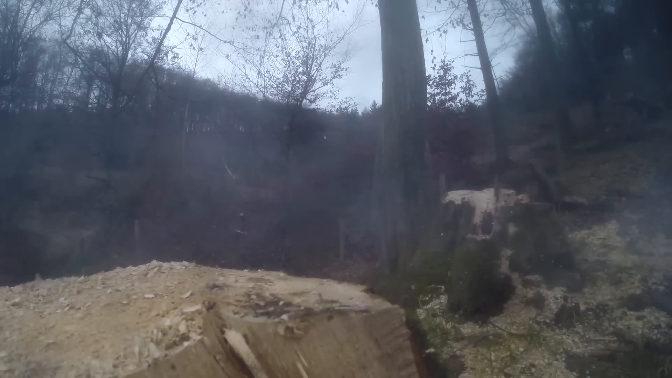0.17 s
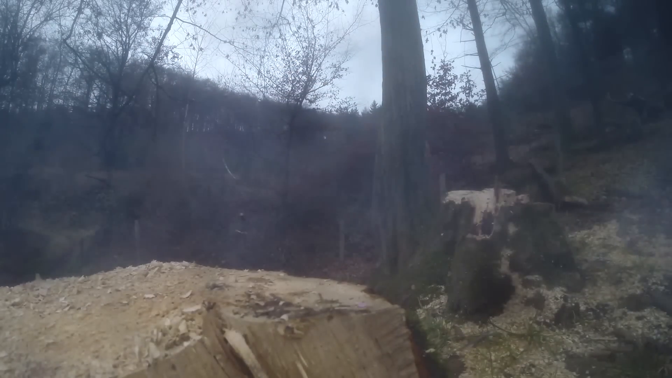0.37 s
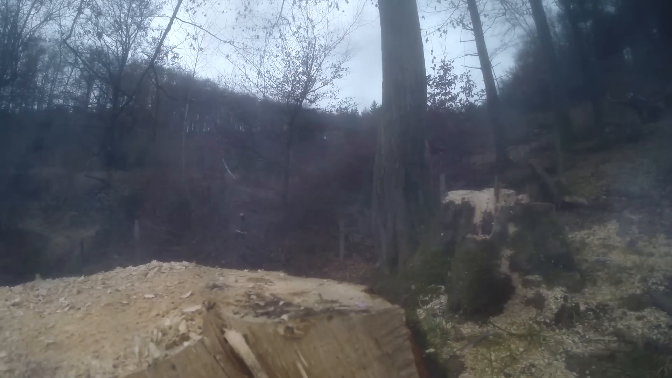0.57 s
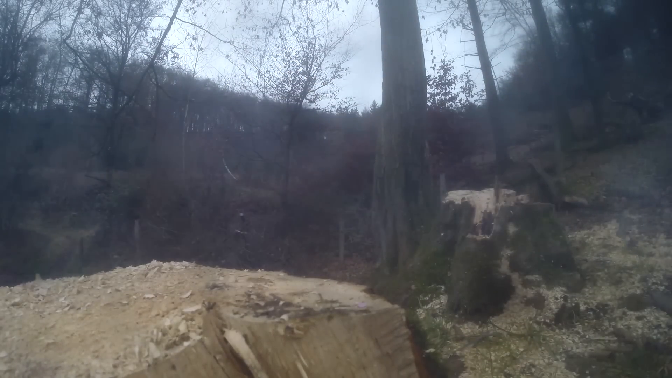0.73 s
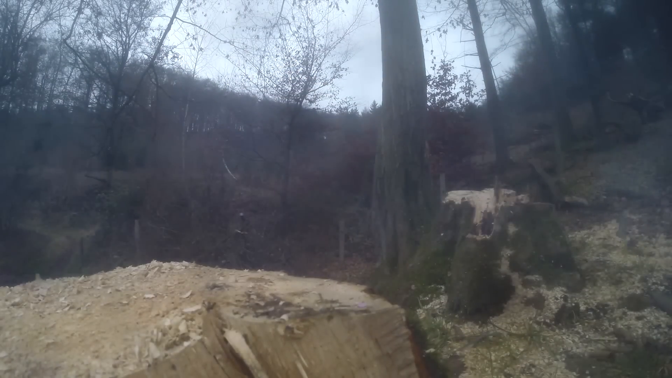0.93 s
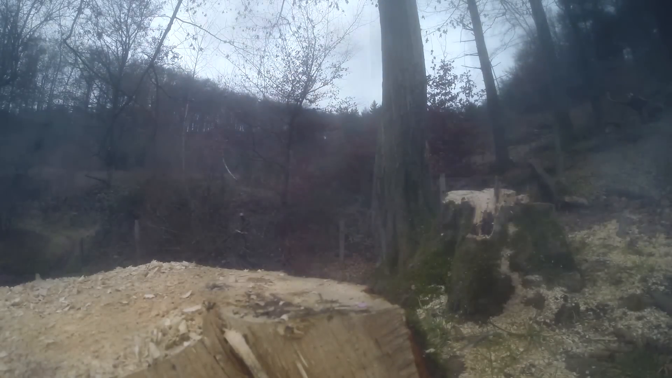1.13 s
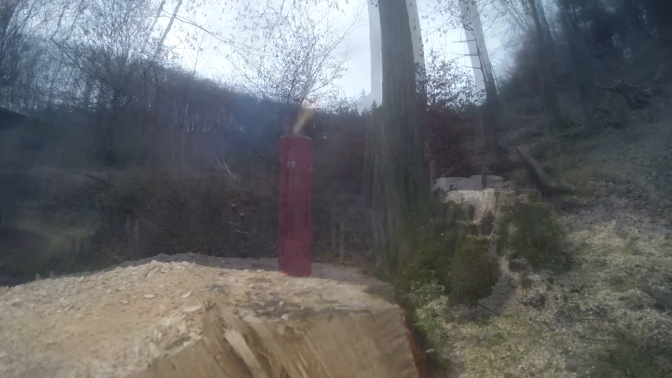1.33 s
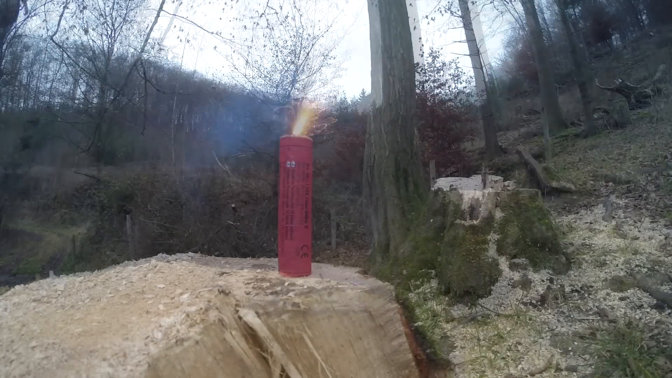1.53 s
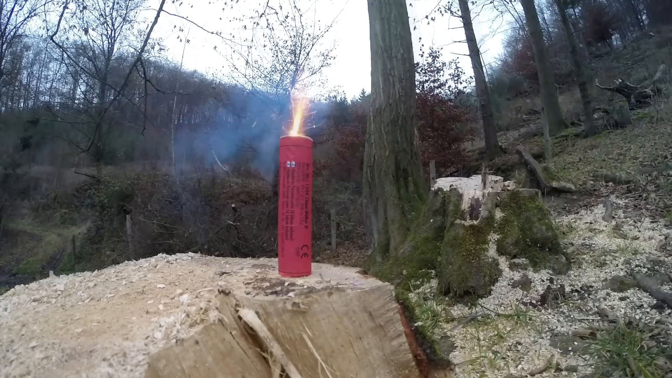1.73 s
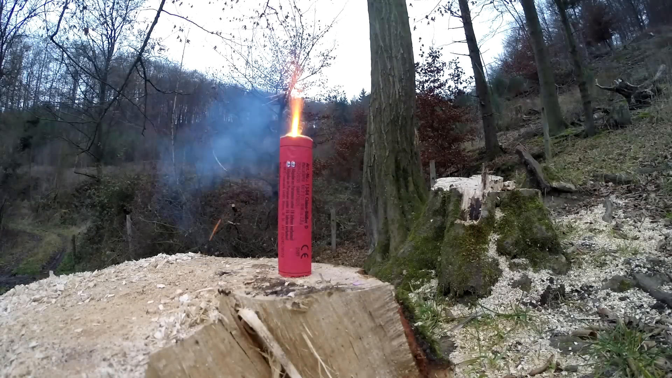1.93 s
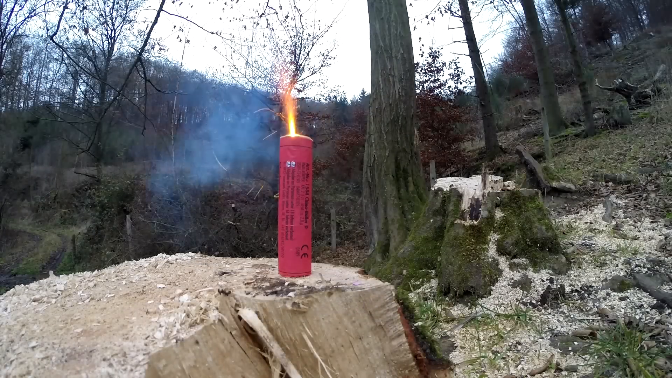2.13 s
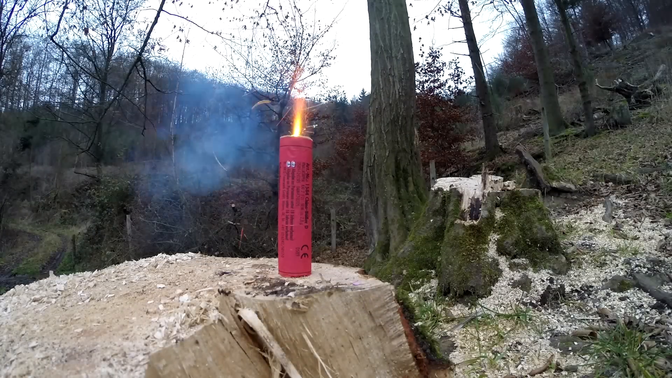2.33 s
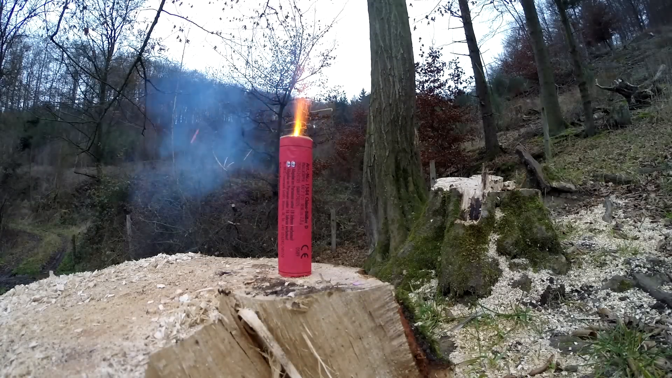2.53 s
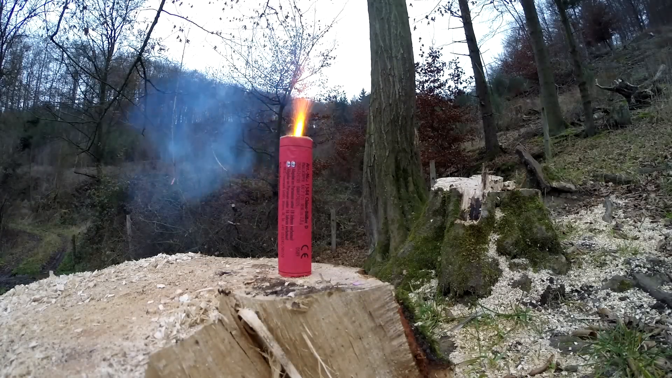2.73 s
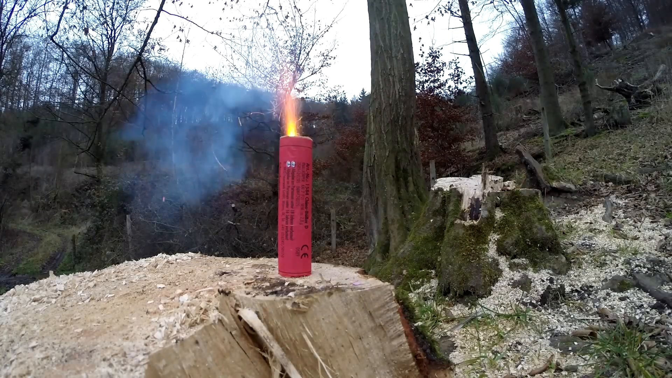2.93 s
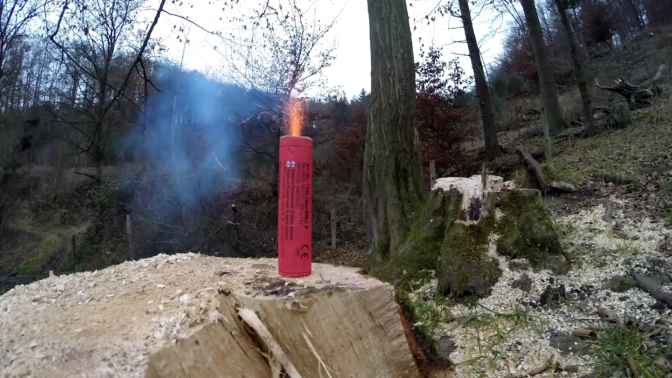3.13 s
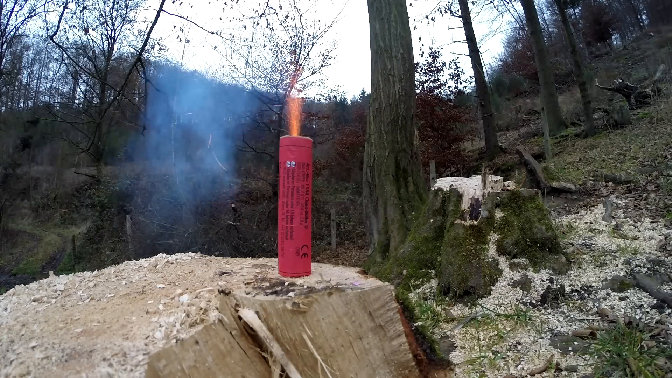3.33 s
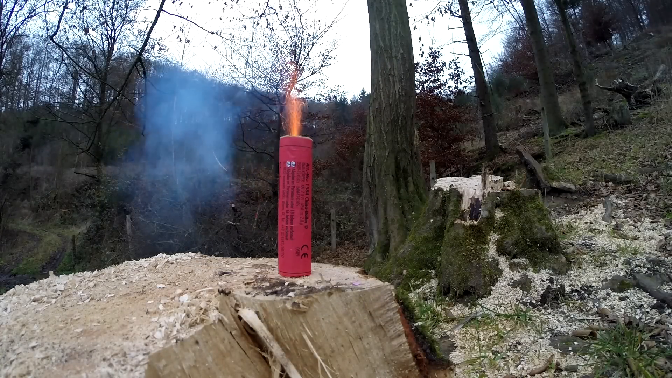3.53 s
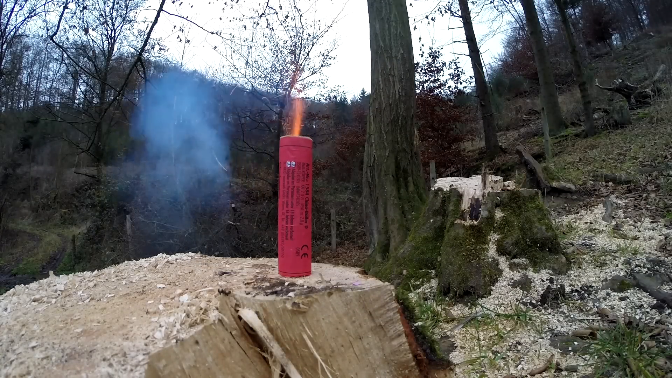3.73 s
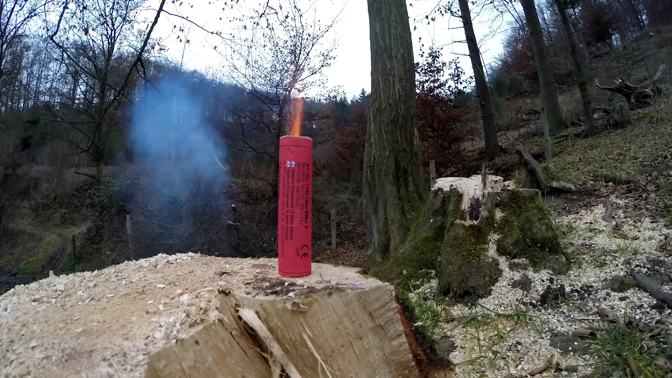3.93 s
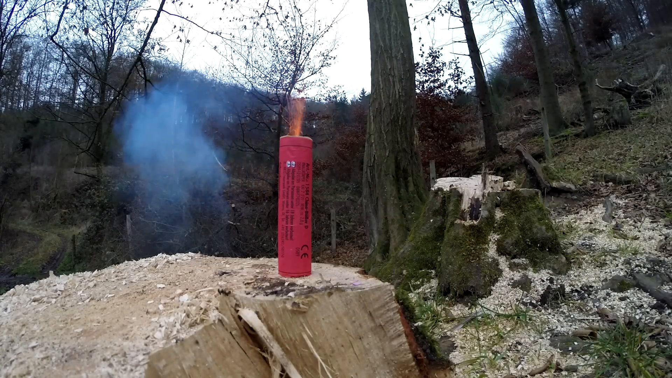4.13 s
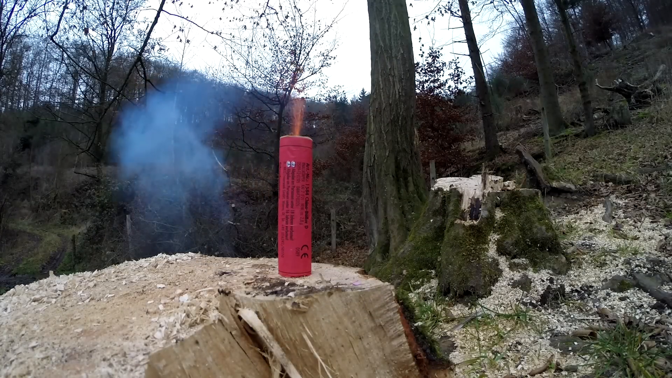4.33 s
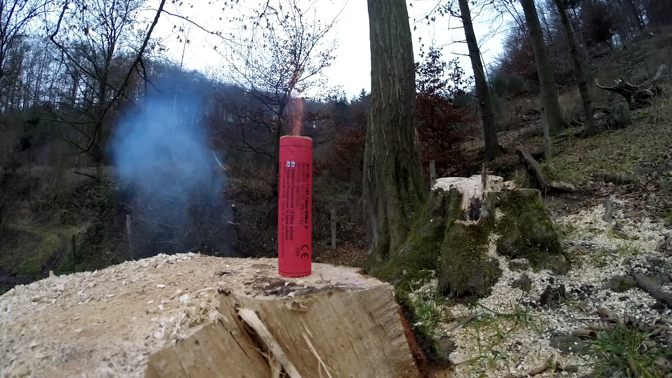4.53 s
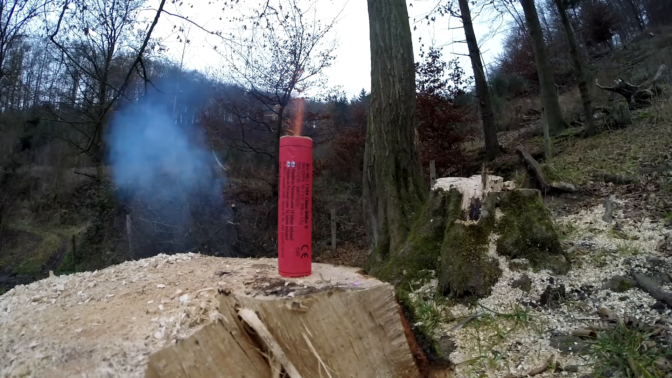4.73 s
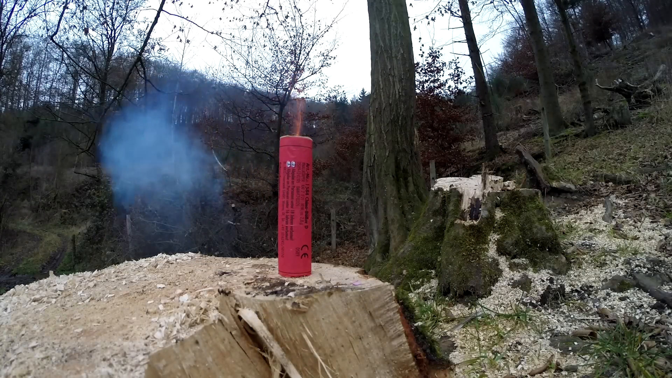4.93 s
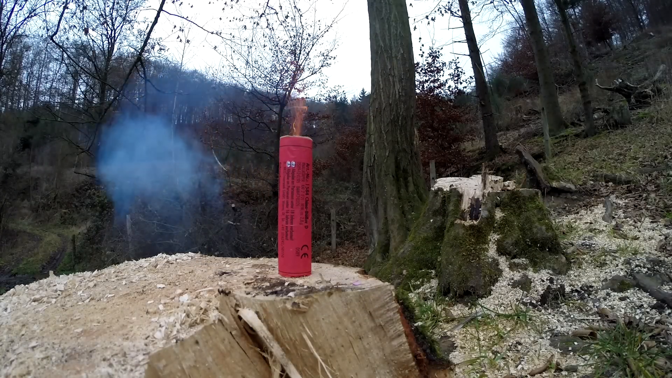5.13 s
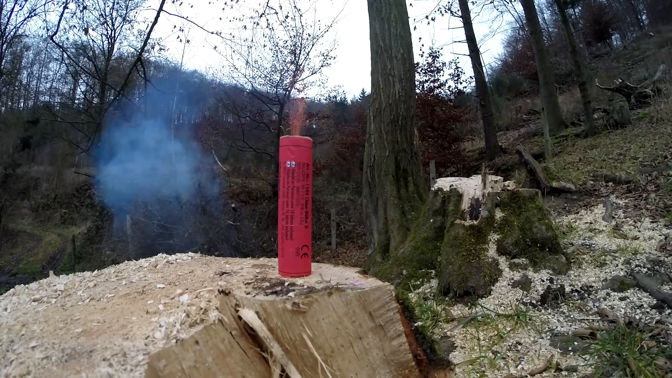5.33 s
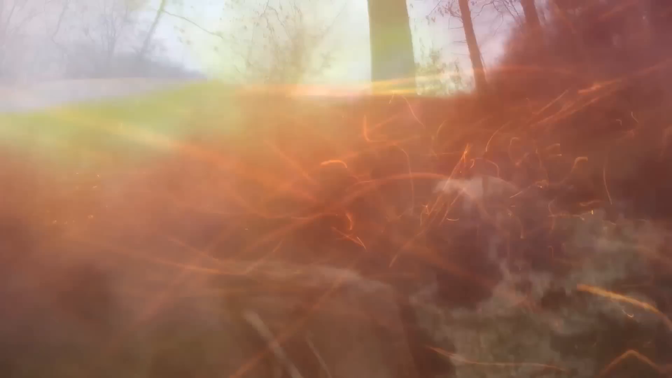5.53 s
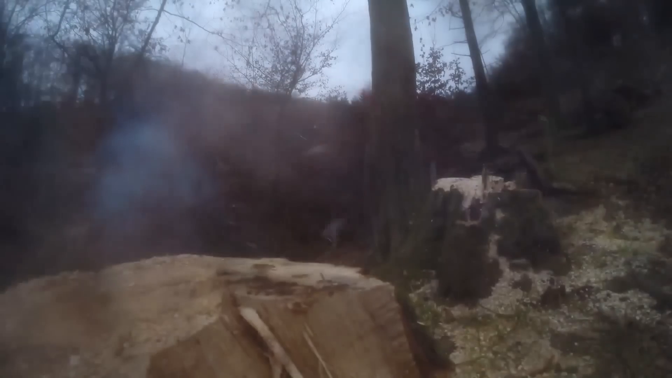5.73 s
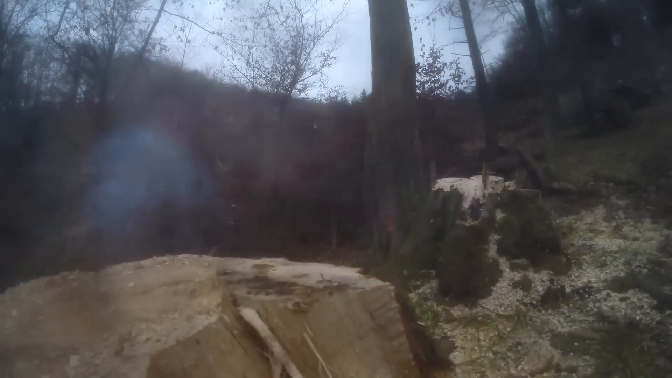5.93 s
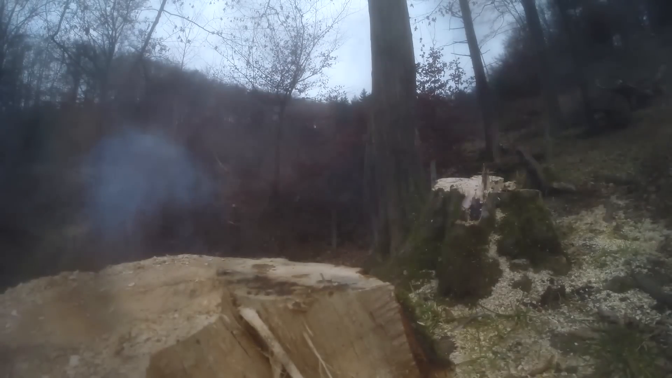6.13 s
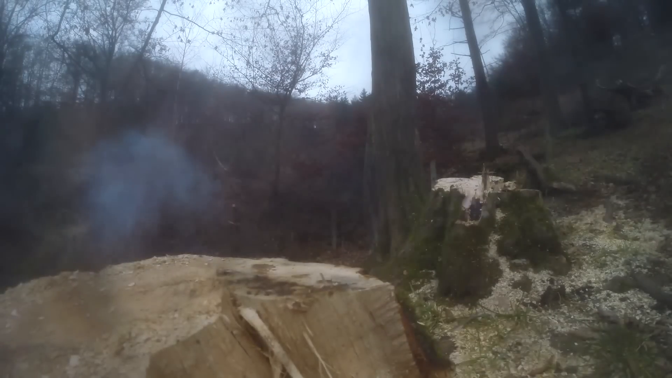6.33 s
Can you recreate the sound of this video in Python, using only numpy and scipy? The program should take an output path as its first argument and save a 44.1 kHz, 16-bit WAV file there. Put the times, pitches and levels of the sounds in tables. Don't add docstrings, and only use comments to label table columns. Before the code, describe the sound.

Outdoors in a wood, a firecracker fuse hisses and sputters, duller as it sinks, then a single violent, clipped blast echoes off the trees.

```python
import sys
import numpy as np
from scipy import signal
from scipy.fft import rfft, irfft
from scipy.io import wavfile
from scipy.ndimage import uniform_filter1d

SR = 44100
rng = np.random.default_rng(int(sys.argv[2]) if len(sys.argv) > 2 else 0)


def wav_out(sig):
    wavfile.write(sys.argv[1], SR, np.round(np.clip(np.atleast_2d(sig).T, -1, 1) * 32767).astype(np.int16))


def nominal_scale(level):
    x = np.asarray(level, float) / 20
    return 10 ** x


N = 284886
EARLIER_S, EARLIER_DB = -0.79, 6.5
BLAST_S, BLAST_DB, BLAST_T60_S = 5.5917, 24, 0.013


def rms_one(x):
    return x / np.sqrt(np.mean(x ** 2) + 1e-20)


def levels(rows):
    s, *columns = np.transpose(rows)
    t = np.arange(N) / SR
    return [nominal_scale(np.interp(t, s, column, left=-200, right=-200)) for column in columns]


def bump(t, length):
    return np.exp(-0.5 * (t / length) ** 2)


def drift(rate):
    r = np.exp(-2 * np.pi * rate / SR)
    slow = signal.lfilter([1], [1, -2 * r, r * r], rng.standard_normal(N + SR))
    slower = uniform_filter1d(slow, size=int(3 * SR / rate))
    return rms_one((slow - slower)[SR:])


def coloured(x, spectrum, edges, notches=()):
    hz = np.arange(1, N // 2 + 2) * SR / N
    spectrum_hz, spectrum_db = np.transpose(spectrum)
    db = np.interp(np.log(hz), np.log(spectrum_hz), spectrum_db)
    for centre, width, depth_db in notches:
        db += depth_db / (1 + (2 * (hz - centre) / width) ** 2)
    shaped = rfft(x) * nominal_scale(db)
    below = [0 * hz] + [1 / (1 + (hz / edge) ** 16) for edge in edges] + [1 + 0 * hz]
    return [rms_one(irfft(shaped * np.sqrt(high - low), N)) for low, high in zip(below, below[1:])]


def ring(hz, t60, length=0.6):
    t = np.arange(int(length * SR)) / SR
    return np.sin(2 * np.pi * hz * t) * nominal_scale(-60 * t / t60)


def add(out, s, sound):
    i = round(s * SR)
    out[i:i + len(sound)] += sound[:N - i]


# pitch_hz, level_db (per Hz)
WOODS = [(240, -61), (400, -28.5), (599, -22), (753, -12.5), (947, -12.5), (1560, -9), (1740, -7.5),
         (2640, -9.5), (3100, -21.5), (3450, -21.5), (10000, -41), (13000, -85.5), (22000, -120)]
# pitch_hz, width_hz, level_db
PORT = [
    (1607, 78, 11.5),
    (2030, 200, 1),
    (2580, 350, 0.5),
]
# after_blast_s, level_db
ECHO = [
    (.02, -49.5),
    (0.081, -52),
    (.095, -45),
    (.17, -44.5),
    (.24, -52.5),
    (.38, -58.5),
    (1.06, -59.5),
    (1.56, -69),
    (2.1, -72),
]
# level_db, loss_db_per_s, nearest_trunks_db, nearest_trunks_t60_s
ECHO_PARTS = [
    (-10.5, -2, -47, .17),
    (-2, 2.5, -61.5, 0.13),
    (-5, -6, -48, 0.31),
]


def woods():
    far_s, far_db, far_length_s = 0.675, 10.5, 0.055
    lumpy = rng.standard_normal(N) * nominal_scale(1.1 * drift(45))
    parts = coloured(lumpy, WOODS, [1300, 3200], PORT)
    out = np.zeros(N)
    for s, blast_db in [(EARLIER_S, EARLIER_DB), (BLAST_S, 0)]:
        after = np.arange(N) / SR - s
        echo, = levels([(s + lag, db + blast_db) for lag, db in ECHO])
        late = [nominal_scale(far_db * bump(after - far_s, far_length_s)), 1, 1]
        for (db, loss_db, near_db, t60), far, part in zip(ECHO_PARTS, late, parts):
            near = (after > ECHO[0][0]) * nominal_scale(near_db - 60 * np.abs(after) / t60)
            spread = echo * far * nominal_scale(db + loss_db * after)
            out += np.hypot(spread, near) * part
    return out


# after_blast_s, level_db
DUCK = [
    (.215, -0.5),
    (.245, -11),
    (.6, -8),
    (.87, -5),
    (1.06, -3),
    (1.38, 0.5),
]


def gain_control():
    t = np.arange(N) / SR
    duck_db = sum(np.interp(t - s, *np.transpose(DUCK)) for s in (EARLIER_S, BLAST_S))
    struck = (t > BLAST_S) * (t < BLAST_S + DUCK[1][0])
    return duck_db, struck


# pitch_hz, level_db (per Hz)
AIR_COLOUR = [(12, -26.5), (20, 0), (129, -1), (180, -3.5), (314, -6.5), (1070, -12), (1620, -15),
              (1860, -18.5), (8370, -26.5), (10500, -26.5), (11400, -30), (12400, -27), (15400, -34.5)]


def air():
    duck_db, struck = gain_control()
    rumble, hiss = coloured(rng.standard_normal(N), AIR_COLOUR, [4000])
    flame_roar = nominal_scale(-14.5 + 2.5) * jet_gains()[0]
    rumble_gain = np.hypot(nominal_scale(-56.5 + duck_db), flame_roar)
    hiss_db = -66.5 + np.minimum(1.9 * duck_db, -5.5 * struck)
    return rumble_gain * rumble + nominal_scale(hiss_db) * hiss


def whine():
    whine_hz, frame_hz = 11000, 50
    t = np.arange(N) / SR
    duck_db, struck = gain_control()
    pulsing = 1
    for k, side in enumerate([0.4, 0.18, 0.12, 0.06], start=1):
        pulsing = pulsing + side * np.exp(-2j * np.pi * k * frame_hz * t)
    tone = np.sqrt(2) * np.real(pulsing * np.exp(2j * np.pi * whine_hz * t))
    return nominal_scale(-73 + np.minimum(duck_db, -9 * struck)) * tone


# start_s, peak_db, pitch_hz, t60_s
TICKS = [(0.0144, -29.5, 7300, 0.0082), (0.0961, -56, 5910, 0.012), (0.1869, -41.5, 5600, 0.01),
         (0.2534, -61, 5340, 0.012), (0.2692, -57, 4510, 0.012), (0.4218, -50, 5570, 0.012),
         (0.4354, -48, 5030, 0.012), (0.4612, -49, 5380, 0.012), (0.5081, -49, 5700, 0.012),
         (0.5254, -49, 6020, 0.012), (0.619, -47, 9640, 0.011), (0.6684, -49, 6740, 0.012),
         (0.8613, -49, 6020, 0.012), (0.933, -39, 9450, 0.011), (0.946, -49, 6090, 0.012),
         (0.9574, -55, 5200, 0.012), (1.2342, -35, 6500, 0.014), (1.239, -29.5, 5650, 0.016),
         (1.247, -38, 5360, 0.013), (5.797, -52, 11500, .01), (5.819, -49, 9000, 0.011),
         (5.911, -41.5, 4500, 0.01), (5.911, -49, 10000, 0.01), (5.9934, -56, 8960, 0.011),
         (6.349, -54.5, 7000, .012), (6.359, -60, 7030, .012)]


def ticks():
    out, t = np.zeros(N), np.arange(2000) / SR
    for s, db, hz, t60 in TICKS:
        noise = rng.standard_normal(len(t))
        band = signal.butter(2, [hz / 1.5, min(hz * 1.5, 0.45 * SR)], "band", fs=SR, output="sos")
        burst = signal.sosfilt(band, noise * nominal_scale(-60 * t / t60))
        add(out, s + 0.001094, nominal_scale(db) * burst / np.abs(burst).max())
    return out


# start_s, peak_db, pitch_hz, t60_s
KNOCKS = [(.097, -50, 1900, .04), (.27, -39, 3100, 0.027), (.365, -39, 1590, .03),
          (0.389, -40, 246.4, 0.21), (1.2418, -27.5, 1840, 0.02), (1.2418, -24, 2280, 0.015),
          (1.2413, -25, 3050, 0.019), (1.24, -14.5, 5700, .007), (1.2352, -39.5, 5530, .01),
          (5.616, -19, 2300, 0.013), (5.617, -34, 3300, .015), (5.767, -39, 3100, 0.053),
          (5.791, -35, 586, 0.043), (5.814, -42, 564, 0.068), (5.9455, -42, 1100, .015),
          (5.946, -35, 1740, 0.023), (6.426, -40, 259, .14)]


def knocks():
    out = np.zeros(N)
    rise = 1 - np.exp(-np.arange(int(0.6 * SR)) / SR / 0.0004)
    for s, db, hz, t60 in KNOCKS:
        pair = ring(hz, t60) + 0.74 * ring(1.13 * hz, 0.55 * t60)
        add(out, s, nominal_scale(db - 5) * rise * pair)
    return out


# pitch_hz, level_db, t60_s
CRACK = [(1040, -22, 0.035), (1350, -13, 0.024), (1640, -29, 0.089), (1873, -14, 0.037), (2270, -16, 0.014),
         (2860, 1, 0.025), (3180, -19, 0.025), (4600, -19, 0.0091), (4970, -16, 0.016),
         (6200, -17.5, 0.025), (6640, -37, 0.016)]


def chip_crack():
    start_s, level_db, low_hz = 0.3865, -19.5, 875
    out, t = np.zeros(N), np.arange(400) / SR
    thin = signal.butter(4, low_hz, "high", fs=SR, output="sos")
    for hz, db, t60 in CRACK:
        chatter = rng.standard_normal(len(t)) * nominal_scale(-60 * t / 0.026)
        chatter[int(0.0008 * SR)] = 9.0
        chatter[int(0.0036 * SR)] = 3.0
        tone = signal.sosfilt(thin, np.convolve(chatter, ring(hz, 0.9 * t60, 0.1)))
        add(out, start_s, nominal_scale(level_db + db - 17) * tone)
    return out


# time_s, level_db
VIGOUR = [
    (1.14, -78),
    (1.27, -57.5),
    (1.5, -51),
    (2.05, -44.5),
    (2.7, -37.5),
    (3.3, -39),
    (3.85, -39),
    (4.5, -43.5),
    (4.88, -42),
    (5.58, -47.5),
]
# time_s, level_db, length_s
SPURTS = [(1.41, 1, 0.038), (1.695, 0.5, 0.0085), (1.78, -3.5, 0.026), (1.806, 2.5, 0.012),
          (2.015, 2, 0.025), (2.347, -1.5, 0.036), (2.623, -0.5, 0.015), (2.652, -3.5, 0.011),
          (2.686, 0.5, .015), (3.105, 1.5, 0.027), (3.226, -1.5, 0.028), (3.26, 4, 0.012),
          (5.561, 10, 0.013)]
# sinking_s, open_air_db, sunk_db, later_sag_db_per_s, share_of_spurts
JET_PARTS = [
    (2.28, 2.5, -6.5, -1.45, 1.2),
    (2.3, -1.4, -1.5, 0.1, 0.9),
    (2.85, -14, -5.5, -2.3, 1),
    (1.8, -7, -25, 0.6, 1.1),
    (2.3, -10.5, -28, 0.7, 0.9),
]
FLARE_DB = [
    0,
    -11,
    7.5,
    2,
    -3,
]


def jet_gains():
    t = np.arange(N) / SR
    vigour, = levels(VIGOUR)
    spurt_db = sum(db * bump(t - s, length) for s, db, length in SPURTS)
    flare = bump(t - 2.94, 0.04)
    gains = []
    for (s, open_db, sunk_db, sag_db, share), flare_db in zip(JET_PARTS, FLARE_DB):
        sunk = 0.5 + 0.5 * np.tanh((t - s) / 0.24 / 2)
        depth_db = open_db + (sunk_db - open_db) * sunk
        later_db = sag_db * np.maximum(t - s, 0)
        gains.append(vigour * nominal_scale(depth_db + later_db + share * spurt_db + flare_db * flare))
    return gains


# pitch_hz, level_db (per Hz)
JET = [(760, -61), (1300, -37.5), (1520, -17), (1770, -10), (2030, -19), (2300, -13.5), (2800, -15),
       (3440, -3.5), (3780, 0), (4370, 0), (5830, -4.5), (7480, -25.5), (9590, -32), (11300, -24.5),
       (15400, -40.5)]
# pitch_hz, width_hz, level_db
NOTCHES = [(1400, 330, -21), (1659, 80, 10.5), (1830, 100, 6), (1949, 47, -15), (2090, 69, -9.5),
           (2900, 71, -13), (3770, 250, -10.5), (3486, 150, 4.5), (4380, 150, 5), (5460, 200, -7.5),
           (6250, 91, -22.5), (6750, 400, 5), (7600, 810, -3), (8250, 400, 9), (8680, 250, -11.5),
           (9640, 300, -8.5), (11800, 500, -7), (12800, 700, 0), (14700, 370, -3.5)]


def fuse():
    grains = (rng.random(N) < 400 / SR) * rng.exponential(1, N)
    spit = grains * rng.choice([-1, 1], N)
    jet = rng.standard_normal(N) + 0.31 * rms_one(spit)
    flutter_db = 0.76 * drift(16) + 0.43 * drift(45)
    parts = coloured(jet * nominal_scale(flutter_db), JET, [2880, 5300, 7490, 9600], NOTCHES)
    return sum(gain * part * nominal_scale(0.48 * drift(10)) for gain, part in zip(jet_gains(), parts))


def hiss_swell():
    swell_hz, level_db, rise_s = 5000, -10, 0.0022
    out, t = np.zeros(N), np.arange(600) / SR
    band = signal.butter(1, [0.85 * swell_hz, 0.93 * swell_hz], "band", fs=SR)
    hiss = rms_one(signal.lfilter(*band, rng.standard_normal(len(t))))
    add(out, BLAST_S - len(t) / SR, nominal_scale(level_db) * hiss * np.exp(-t[::-1] / rise_s))
    return out


# pitch_hz, level_db, t60_s
HOUSING = [(420, -6, .014), (663, -13, .012), (942, -11.5, .021), (982, 0.5, 0.022), (1286, -7.5, 0.044),
           (1630, -6, 0.043), (1830, -11, 0.046), (2087, -9.5, 0.032), (2565, -3, 0.024), (3100, 1, 0.024),
           (3668, -2.5, 0.016), (4790, -7, 0.015), (5700, -3, 0.015), (6230, -3, .005), (7520, -25, .02),
           (9100, -28, 0.013), (11210, -36.5, 0.026)]
# level_db, time_constant_s
REBOUND = [
    (-19, .007),
    (-40.5, .05),
]


def blast():
    suction_s, suction_length_s, suction_db = 0.0027, 0.00067, 1.5
    out, t = np.zeros(N), np.arange(3000) / SR
    roar = rng.standard_normal(len(t)) * nominal_scale(-60 * t / BLAST_T60_S)
    shock = 0.19 * np.diff(roar)
    shock[0] = 1
    body = sum(nominal_scale(db) * signal.fftconvolve(shock, ring(hz, 0.55 * t60, 0.05)) for hz, db, t60 in HOUSING)
    add(out, BLAST_S, -nominal_scale(BLAST_DB) * body / np.abs(body).max())
    band = signal.butter(2, [3500, 7300], "band", fs=SR, output="sos")
    crack = signal.sosfilt(band, np.diff(roar)) * np.exp(-t[1:] / 0.002)
    add(out, BLAST_S, nominal_scale(9.5) * crack)
    slap = signal.lfilter([0.5], [1, -0.5], roar)
    add(out, BLAST_S + 0.0085, nominal_scale(-17) * slap)
    add(out, BLAST_S, -nominal_scale(suction_db) * bump(t - suction_s, suction_length_s))
    settle = np.arange(SR // 4) / SR
    rebound = sum(nominal_scale(db) * np.exp(-settle / tau) for db, tau in REBOUND)
    add(out, BLAST_S + 1.5 * suction_s, rebound)
    return out


# delay_s, pitch_hz, level_db, t60_s
AFTER_RINGS = [
    (.004, 1815, -28, 0.43),
    (.004, 1790, -12, .04),
    (.111, 12.4, -41, .3),
    (.205, 15.6, -49, 1.7),
    (.229, 31.2, -58, 1.3),
    (.237, 46.8, -67, 1.5),
]
# time_s, level_db
SHAKE = [
    (5.625, -45),
    (5.651, -57),
    (5.711, -46),
    (5.749, -49),
    (5.815, -64),
    (5.86, -82),
]


def shaken_mount():
    out = np.zeros(N)
    for delay, hz, db, t60 in AFTER_RINGS:
        add(out, BLAST_S + delay, nominal_scale(db) * ring(hz, t60, 0.9))
    colour = [(20, -3.5), (60, 0), (120, -11.5), (300, -17.5), (900, -51.0)]   # Hz, dB per Hz
    rumble, = coloured(rng.standard_normal(N), colour, [])
    return out + levels(SHAKE)[0] * rumble


def scene():
    background = woods() + air() + whine()
    debris = ticks() + knocks() + chip_crack()
    firecracker = fuse() + hiss_swell() + blast() + shaken_mount()
    return (background + debris + firecracker)[None]


def top_cut(x):
    return signal.sosfilt(signal.butter(12, 15590, fs=SR, output="sos"), x)


def record(dry):
    overloaded = dry / (1 + dry ** 4) ** 0.25
    low_pass = signal.cheby2(14, 20, 15330, fs=SR, output="sos")
    return top_cut(signal.sosfiltfilt(low_pass, overloaded))


dry = scene()
out = record(dry)
wav_out(out)
```